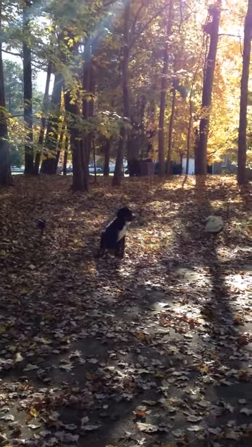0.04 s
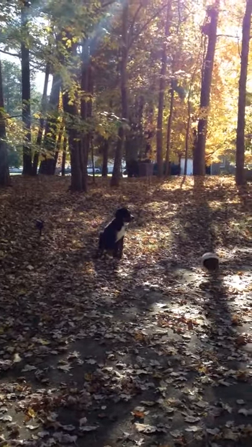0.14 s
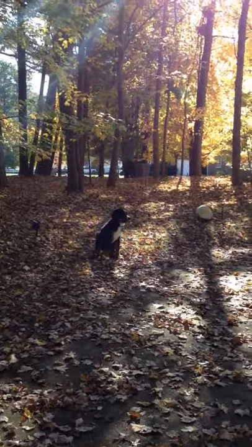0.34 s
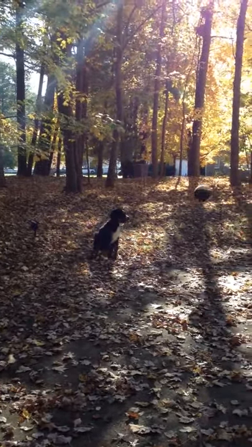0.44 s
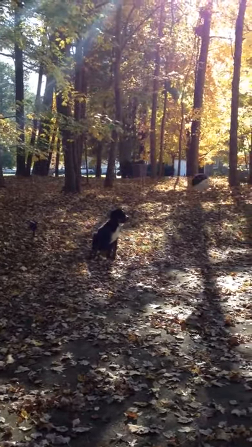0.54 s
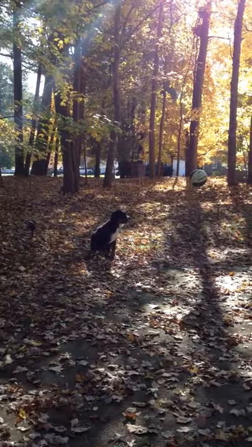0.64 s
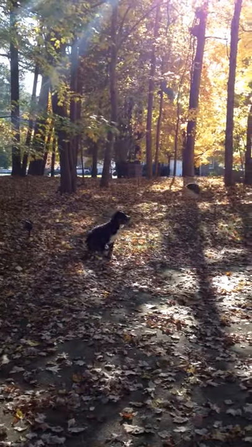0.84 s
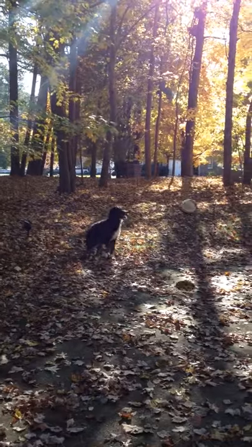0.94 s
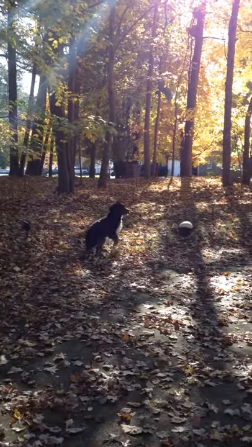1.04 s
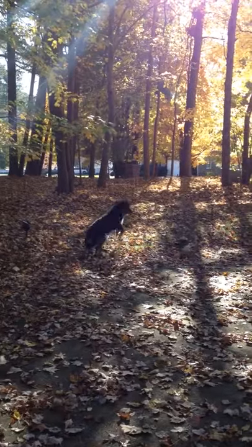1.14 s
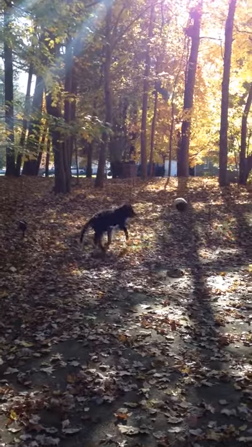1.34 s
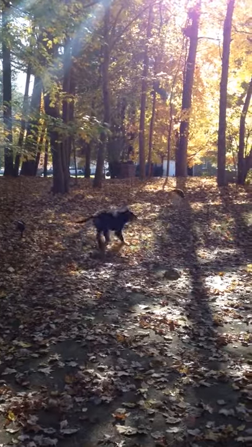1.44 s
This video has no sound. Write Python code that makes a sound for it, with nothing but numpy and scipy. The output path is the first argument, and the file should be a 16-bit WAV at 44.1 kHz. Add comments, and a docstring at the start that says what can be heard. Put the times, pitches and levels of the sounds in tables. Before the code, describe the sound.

Two crunchy thumps of a ball on leafy ground, with a faint rustle and distant bird.

```python
"""A ball bounces twice on leaf-covered ground in a quiet wood, heard through one microphone.
Each bounce crushes dry leaves, slaps, thumps and rings the ball's shell and air; trunks near
and far scatter the sound back. Much fainter, a dog stirs in the leaves, and a distant bird
gives one thin falling chirp over the steady hush of the place."""
import sys
import numpy as np
from scipy import signal
from scipy.fft import rfft, irfft
from scipy.io import wavfile

SR = 44100
rng = np.random.default_rng(int(sys.argv[2]) if len(sys.argv) > 2 else 0)


def generate_wav(sig):
    """Save sig (samples, or channels by samples) to the path in sys.argv[1] as 16-bit PCM at SR."""
    pcm = np.round(np.clip(np.atleast_2d(sig).T, -1, 1) * 32767).astype(np.int16)
    wavfile.write(sys.argv[1], SR, pcm)


N = 66150

# tone colours of the hush, the wood's echo, the dog's rustle and its steps
# (frequency [Hz], relative level [dB])
HUSH_COLOUR = [(25, -42), (50, -10.5), (90, -2.5), (170, 4), (320, -1), (600, -0.5), (950, -0.5),
               (1900, -6.5), (4000, -8.5), (4500, -17), (8200, -16.5), (9200, -27), (15000, -25)]
ECHO_COLOUR = [(80, -1), (160, -5.5), (300, -1.5), (480, -6.5), (900, -5.5), (1400, 0.5), (2500, -4),
               (4200, -1), (8000, -2.5), (15000, -1.5)]
DOG_RUSTLE_COLOUR = [(200, -11), (1000, -3), (3500, 3), (5000, -3.5), (8000, 0.5), (9200, -6),
                     (15000, -16.5)]
DOG_STEP_COLOUR = [(80, -11), (170, -7), (300, -11), (550, 4.5), (1200, 3), (2000, 4), (3500, 3.5),
                   (4700, -1), (6800, 7), (8200, -1), (9200, -12), (15000, -5.5)]
# the dog's steps in the leaves (time [s], level [dB], half length [s])
DOG_STEPS = [(0.955, -67, 0.035), (1.07, -57, 0.0055), (1.097, -52.5, 0.0084), (1.131, -58.5, 0.009),
             (1.378, -58, 0.0094), (1.435, -51.5, 0.0038), (1.45, -51.5, 0.0059), (1.49, -56, 0.02)]
# tone colours of the ball's slap and of the leaves it crushes (frequency [Hz], relative level [dB])
SLAP_COLOUR = [(100, 9.5), (400, 1), (1000, 6), (2600, 5), (4600, -4.5), (6500, -2), (8200, -20.5),
               (9100, -24), (10700, -20.5), (15000, -15.5)]
CRUNCH_COLOUR = [(150, -25.5), (600, 1), (1200, -1), (2200, -10), (3600, -5.5), (4600, -14), (6600, -10),
                 (8200, -10), (9000, -21), (15000, -21.5)]
# modes of the ball's shell and air; the spot that meets the ground sets their strength
# (frequency [Hz], relative level in first bounce [dB], in second bounce [dB], time to fall 60 dB [s])
RING_MODES = [(380.3, 0, 0, 0.06), (461, 4, 4, 0.075), (853, -14.5, -23, 0.024), (939, 9, 9, 0.027),
              (1129, -1, 4.5, 0.029), (1196, 1.5, -5.5, 0.039), (1335, -1.5, -4, 0.048),
              (1610, -1, -5, 0.018), (2045, -8.5, 2.5, 0.02), (2187, 3.5, -5, 0.016),
              (2383, -7, -3.5, 0.032), (2530, -4, -29, 0.021), (3167, -15, 5, 0.016), (3723, -34, 0, 0.019)]
# the ball's landings (time [s], thump [dB], slap [dB], ring [dB], crunch [dB],
# time pressing the leaves [s], ring pitch [ratio], echo [dB], far trunk's delay [s])
LANDINGS = [(0.2085, -21.5, -6, -26, -28.5, 0.0053, 1.0, -2.5, 0.140),
            (1.1746, -23.5, -17, -29.5, -26.5, 0.0041, 1.025, 0.5, 0.128)]


def undb(db):
    """Decibels to gain."""
    return 10 ** (np.asarray(db) / 20)


def unit(x):
    """Scale to rms 1."""
    return x / np.sqrt(np.mean(x ** 2))


def since(start):
    """Seconds since a moment, zero before it."""
    return np.maximum(np.arange(N) / SR - start, 0)


def swell(age, peak_s):
    """A rise to 1 and a quick rounded fall."""
    return age / peak_s * np.exp((1 - (age / peak_s) ** 2) / 2)


def decay(age, t60_s):
    """A fall of 60 dB every t60_s."""
    return np.exp(-np.log(1000) * age / t60_s)


def convolve(x, impulse_response):
    """Pass a sound through an impulse response."""
    return signal.fftconvolve(x, impulse_response)[:N]


def response(colour, size=4096):
    """Causal impulse response with the given tone colour."""
    hz, db = np.array(colour).T
    freqs = np.maximum(np.arange(size // 2 + 1) * SR / size, 1)
    gain = undb(np.interp(np.log(freqs), np.log(hz), db))
    cepstrum = irfft(np.log(gain))
    cepstrum[1:size // 2] *= 2  # fold to minimum phase
    cepstrum[size // 2 + 1:] = 0
    return irfft(np.exp(rfft(cepstrum)))


def crackle(colour, spread_db):
    """Dense tiny clicks of uneven size, rms 1."""
    sizes = undb(spread_db * np.minimum(rng.standard_normal(N), 2))
    return unit(convolve(rng.standard_normal(N) * sizes, response(colour)))


def hush(level_db=-55.5, points=24):
    """The faint background of the wood, wavering by about a decibel."""
    waver_db = np.interp(np.arange(N), np.linspace(0, N, points), rng.standard_normal(points))
    noise = unit(convolve(rng.standard_normal(N), response(HUSH_COLOUR)))
    return undb(level_db + waver_db) * noise


def wood_echo(x, delay_s=0.029, spread_db=9.4, trunks_db=-7, far_db=-20):
    """The wood answers: a little scatter from close by, then many trunks, then a weak distant tail."""
    late = since(delay_s)
    scatter = rng.standard_normal(N)
    sizes = undb(spread_db * np.minimum(rng.standard_normal(N), 2))
    build_up = np.where(late > 0, 1, undb(-7) * since(0) / delay_s)
    trunks = build_up * decay(late, t60_s=0.31)
    far = build_up * decay(late, t60_s=0.98)
    envelope = np.hypot(undb(trunks_db) * trunks, undb(far_db) * far) / np.linalg.norm(trunks)
    reflections = convolve(unit(scatter * sizes) * envelope, response(ECHO_COLOUR))
    return convolve(x, reflections)


def trunk_echoes(x, far_s, near_s=0.0318, top_hz=2600):
    """Two single dull echoes reach the microphone, from a near and a far trunk."""
    dull = signal.sosfilt(signal.butter(2, top_hz, fs=SR, output="sos"), x)
    near = undb(-17.5) * np.roll(dull, int(near_s * SR))
    far = undb(-28.5) * np.roll(dull, int(far_s * SR))
    return near + far


def bird(start_s=0.97, from_hz=8350, to_hz=7230, glide_s=0.0077, echo_s=0.059):
    """In the distance, one high whistle drops onto its final pitch; the trees repeat it faintly."""
    age = since(start_s)
    hz = to_hz + (from_hz - to_hz) * np.exp(-age / glide_s)
    chirp = undb(-46.5) * swell(age, peak_s=0.017) * np.sin(2 * np.pi * np.cumsum(hz) / SR)
    echo = undb(-29) * np.roll(chirp, int(echo_s * SR))
    return chirp + echo + undb(-8) * wood_echo(chirp)


def dog(start_s=0.74, rise_s=0.14, rustle_db=-62):
    """Leaves start to rustle as the dog gets up; each step crunches a few more."""
    t = since(0)
    rise = np.minimum(since(start_s) / rise_s, 1)
    rustle = undb(rustle_db) * rise * crackle(DOG_RUSTLE_COLOUR, spread_db=2)
    steps = sum(undb(db) * np.exp(-((t - at) / half) ** 2 / 2) for at, db, half in DOG_STEPS)
    return rustle + steps * crackle(DOG_STEP_COLOUR, spread_db=3.5)


def leaf_crunch(start, press_s, touch_db=-9.5, fall_s=0.0016, settle_s=0.028):
    """Dry leaves crackle louder as the ball presses down to the soil, then settle."""
    t, age = since(0), since(start)
    press_left = np.clip((start - t) / press_s, 0, 1)
    pressing = (t > start - press_s) * undb(touch_db * np.sqrt(press_left))
    release = np.exp(-age / fall_s) + undb(-12) * np.exp(-age / settle_s)
    return np.where(age > 0, release, pressing) * crackle(CRUNCH_COLOUR, spread_db=1.5)


def ball_ring(age, spot, pitch, rise_cycles=1.18):
    """The modes of the ball's shell and air build up over a cycle or two and die away."""
    ring = 0
    for hz, *spot_db, t60_s in RING_MODES:
        envelope = (1 - np.exp(-age * hz / rise_cycles)) * decay(age, t60_s)
        ring -= undb(spot_db[spot]) * envelope * np.cos(2 * np.pi * hz * pitch * age)
    return ring


def ball_slap(start):
    """One sharp click as the ball meets the soil."""
    click = response(SLAP_COLOUR)
    return -convolve(signal.unit_impulse(N, int(start * SR)), click / np.abs(click).max())


def ball_thump(age, hz=168.8):
    """The low body of the impact, a few cycles long."""
    return swell(age, peak_s=0.0065) * np.sin(2 * np.pi * hz * age)


def bounce(spot, start, thump_db, slap_db, ring_db, crunch_db, press_s, pitch, echo_db, far_trunk_s):
    """One landing reaches the microphone directly, then again off the trees."""
    age = since(start)
    thump = undb(thump_db) * ball_thump(age)
    slap = undb(slap_db) * ball_slap(start)
    ring = undb(ring_db) * ball_ring(age, spot, pitch)
    leaves = undb(crunch_db) * leaf_crunch(start, press_s)
    direct = thump + slap + ring + leaves
    return direct + undb(echo_db) * (wood_echo(direct) + trunk_echoes(direct, far_trunk_s))


def scene():
    """One microphone in the wood: the ball in front, the dog, bird and hush behind it."""
    ball = sum(bounce(spot, *landing) for spot, landing in enumerate(LANDINGS))
    return (ball + dog() + bird() + hush())[None]


def record(dry, low_cut_hz=105, top_hz=15150):
    """The recorder thins the deep bass and cuts the top."""
    thin = signal.sosfilt(signal.butter(2, low_cut_hz, "high", fs=SR, output="sos"), dry)
    return signal.sosfilt(signal.ellip(10, .2, 70, top_hz, fs=SR, output="sos"), thin)


dry = scene()
out = record(dry)
generate_wav(out)
```